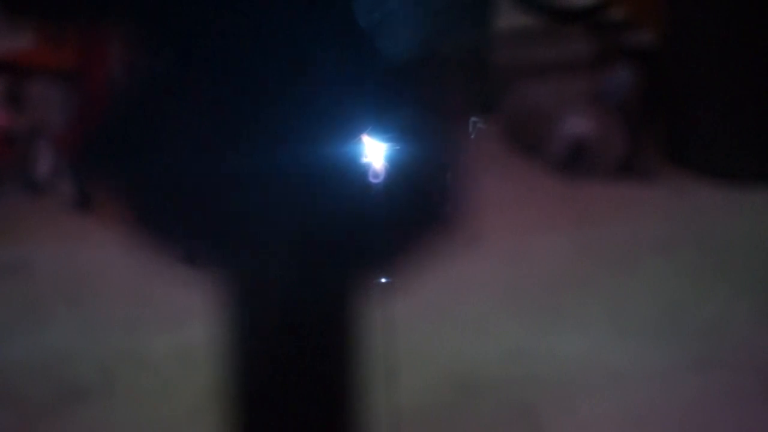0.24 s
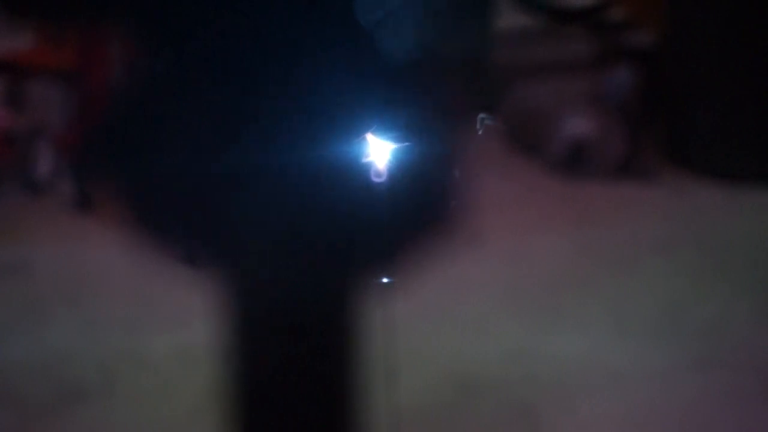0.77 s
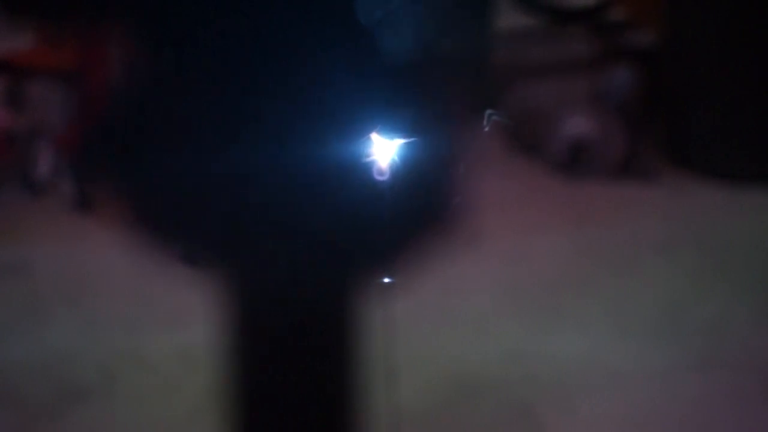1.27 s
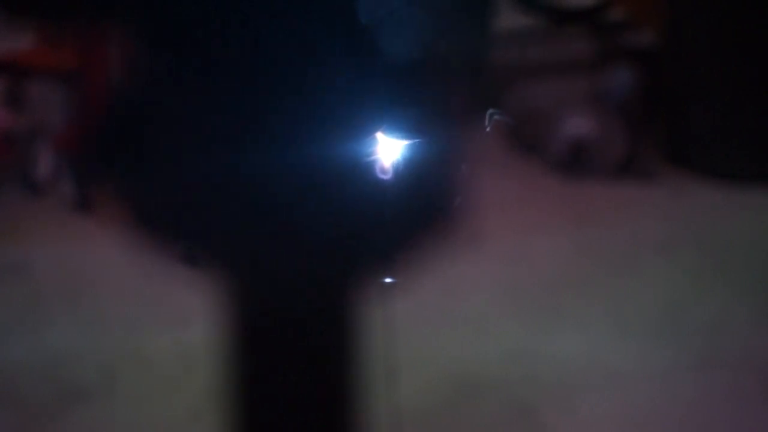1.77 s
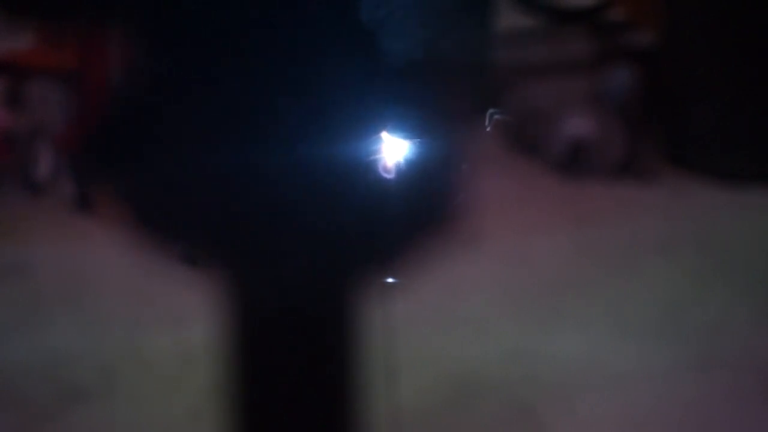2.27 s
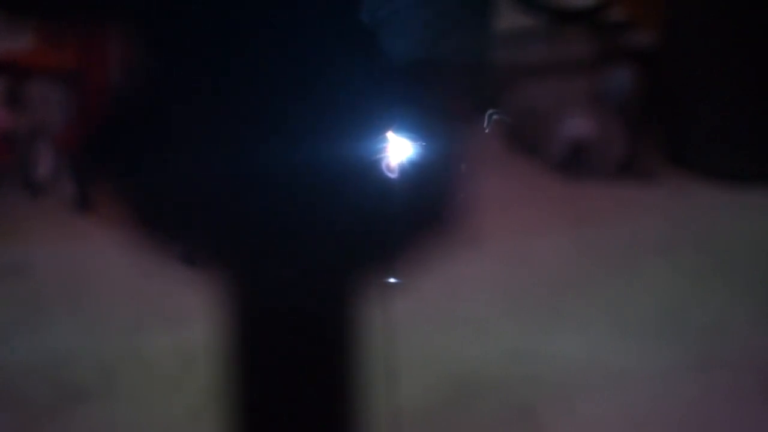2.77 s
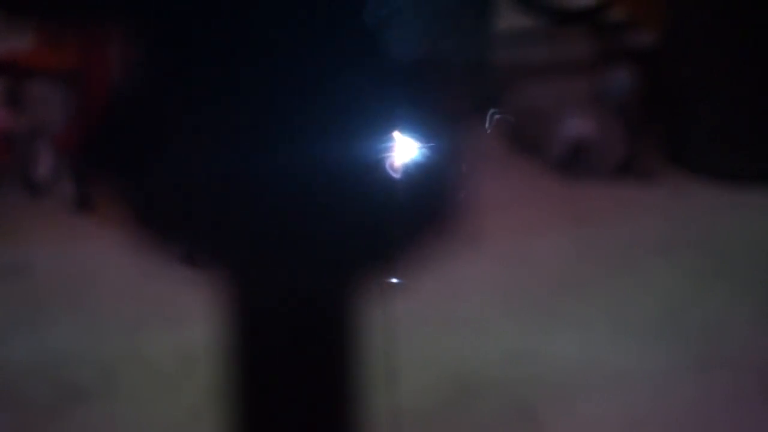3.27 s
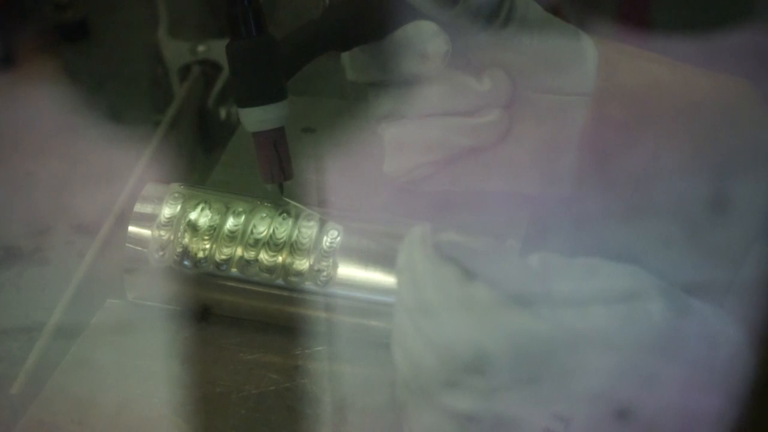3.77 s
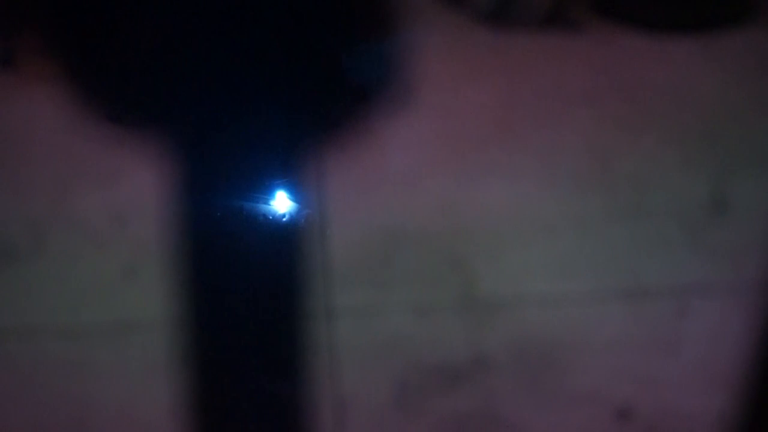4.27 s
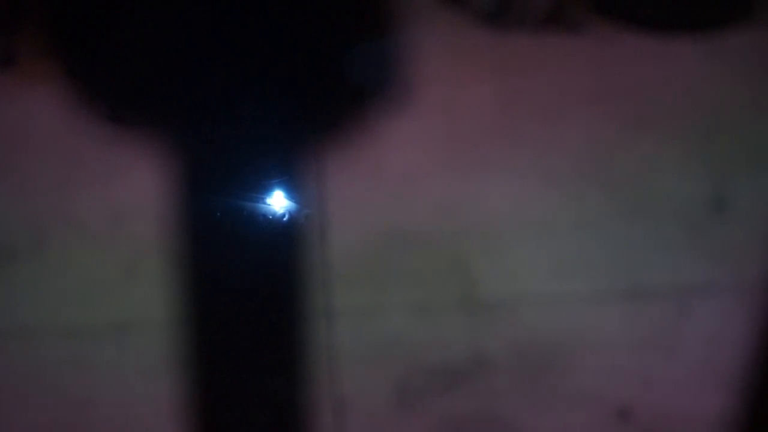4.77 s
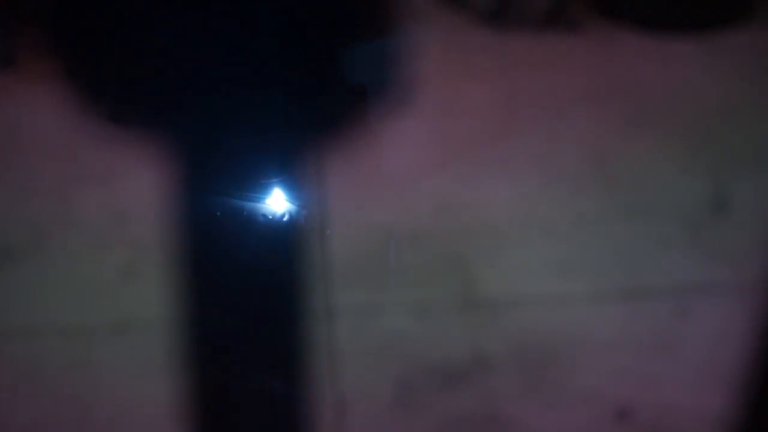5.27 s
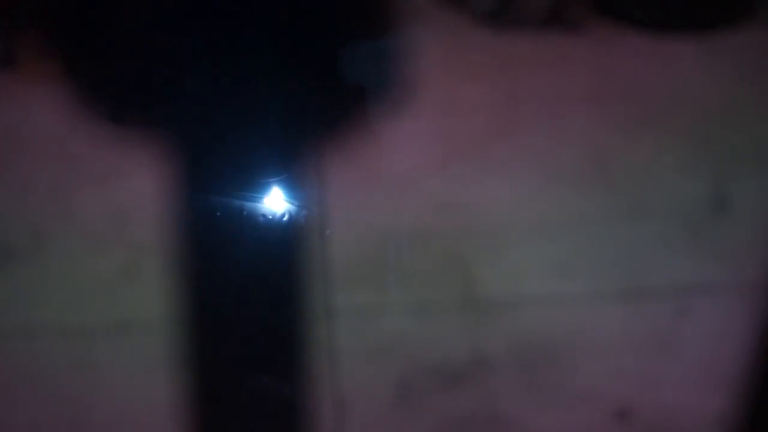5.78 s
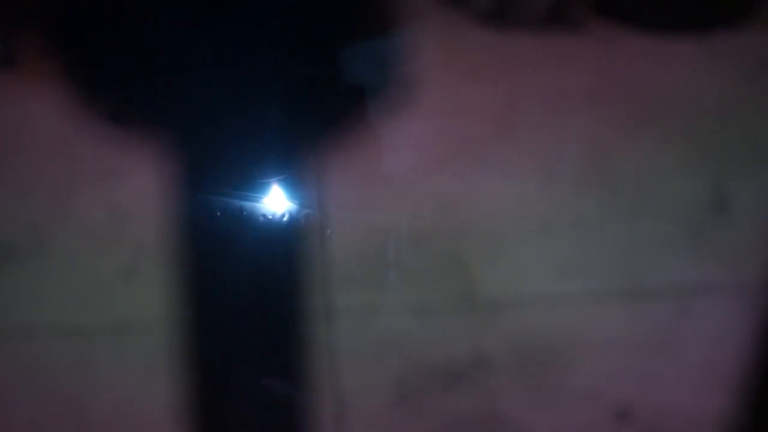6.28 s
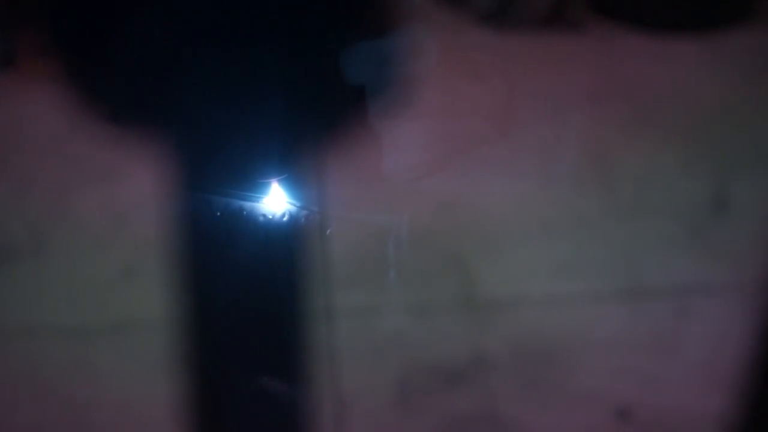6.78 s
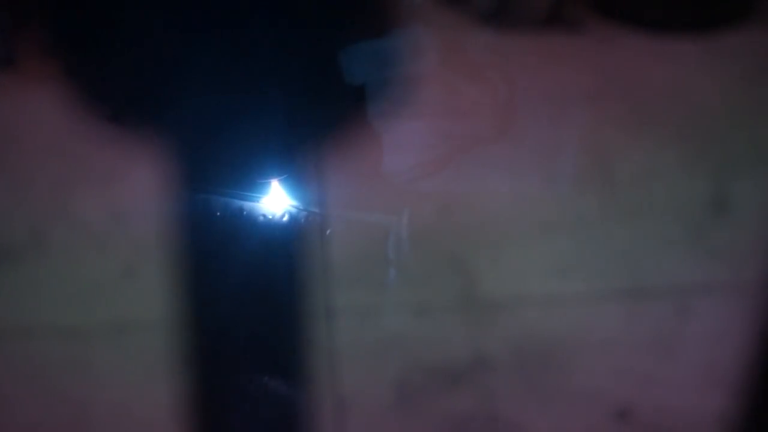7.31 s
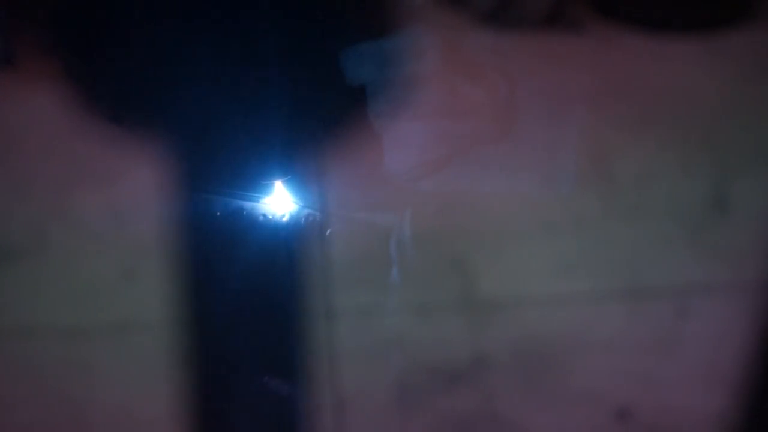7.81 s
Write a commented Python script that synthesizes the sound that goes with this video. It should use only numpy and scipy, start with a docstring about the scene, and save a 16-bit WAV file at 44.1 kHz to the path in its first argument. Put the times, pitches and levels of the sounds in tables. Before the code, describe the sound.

Close raspy electric arc buzz and hiss in a workshop, a short fan-filled pause with dull bumps, then a crackling restart at lower pitch.

```python
"""Close on a workshop bench, in stereo: an AC TIG arc buzzes on a metal tube over the welder's fan.
Each reversal of the current snaps the air, and hiss pulses with the snaps; tiny spits ring the bench.
The arc stops at 3.75 s; the fan stands out and a few soft handling knocks fall in and just after the pause.
At 4.07 s the arc is struck again at a lower frequency, fizzes and sputters with sharp pops, then settles
and swells. Later its hiss brightens in short spells, with another burst of pops near 7.5 s."""
import sys
import numpy as np
from scipy import signal
from scipy.fft import rfft, irfft, next_fast_len
from scipy.io import wavfile
from scipy.ndimage import uniform_filter1d, map_coordinates

SR = 44100
rng = np.random.default_rng(int(sys.argv[2]) if len(sys.argv) > 2 else 0)


def generate_wav(signal):
    """Clip the signal to [-1, 1] and save it as 16-bit WAV at the path in sys.argv[1]."""
    frames = np.transpose(np.atleast_2d(signal))
    scaled = np.clip(frames, -1, 1) * 32767
    pcm = np.round(scaled).astype(np.int16)
    wavfile.write(sys.argv[1], SR, pcm)


N = 355005
T = np.arange(N) / SR
TOP_HZ = 15800  # upper limit of the sound


def amp(db):
    """Decibels to gain."""
    return np.exp(np.asarray(db) * np.log(10) / 20)


def unit(x):
    """Scale to rms 1."""
    return x / np.sqrt(np.mean(x ** 2) + 1e-20)


def along(points, hz):
    """Read (f/Hz, value) points on a log frequency axis."""
    f, v = np.transpose(points)
    return np.interp(np.log(hz + 1), np.log(f + 1), v)


def curve(points):
    """Read (t/s, value) points at every sample."""
    t, v = np.transpose(points)
    return np.interp(T, t, v)


def wobble(rate, size=32):
    """A smooth random curve, rate knots a second."""
    knots = rng.standard_normal(int(N * rate / SR) + 4)
    coarse_t = T[::size]
    return np.interp(T, coarse_t, map_coordinates(knots, [coarse_t * rate]))


def sine(hz, phase):
    """A tone of rms 1 with a wandering phase in radians."""
    return np.sqrt(2) * np.sin(2 * np.pi * hz * T + phase)


def filtered(x, response):
    """x times a response of frequency."""
    m = next_fast_len(N + 8192)
    return irfft(rfft(x, m) * response(np.fft.rfftfreq(m, 1 / SR)), m)[..., :N]


def width(hz, split_hz=1150, peak_hz=2400, peak=0.91):
    """Side-to-mid ratio of diffuse sound.

    The channels agree in the bass, but for the deepest rumble, and differ most around 2.4 kHz."""
    apart = 0.81 + peak / (1 + ((hz - peak_hz) / 300) ** 2)
    rumble = 0.72 / (1 + (hz / 35) ** 2)
    return 0.043 + rumble + apart / (1 + (split_hz / (hz + 1)) ** 6)


def noise(spectrum):
    """Diffuse stereo noise of rms 1."""
    mid = filtered(rng.standard_normal(N), lambda hz: amp(along(spectrum, hz)))
    side = filtered(rng.standard_normal(N), lambda hz: amp(along(spectrum, hz)) * width(hz))
    return unit(np.array([mid + side, mid - side]))


def ring(modes, t, scatter, scatter_db=1.2):
    """Damped modes, a little different at each blow."""
    out = 0
    for hz, db, t60 in modes:
        decay = amp(db + rng.normal(0, scatter_db) - 60 * t / t60)
        out = out + decay * np.sin(2 * np.pi * hz * (1 + scatter * rng.normal()) * t)
    return out


def cycle(harmonics, turns, fades=(), age=0, size=65536):
    """Play stereo harmonics at rms 1 along a count of cycles; some swell or fade with age in seconds."""
    harmonics = harmonics / np.sqrt(np.sum(abs(harmonics) ** 2) / 2 / 2)
    wave = irfft(np.pad(harmonics, ((0, 0), (1, 0))), size) * size / 2
    out = wave[:, (turns * size).astype(int) % size]
    for k, db_per_s in fades:
        if harmonics[0, k - 1]:
            partial = np.real(harmonics[:, k - 1, None] * np.exp(2j * np.pi * k * turns))
            out = out + (amp(db_per_s * age) - 1) * partial
    return out


def snaps(rate, orders, treble, sides, side_db, lean, crackle, snap_gain, snap_hz, bunching, diffuse,
          near, near_decay, back_snap, back_echo, balance, crackle_turn=0.52, bounce=0.66, bounce_s=.00062):
    """Stereo harmonics of two snaps a cycle, one at each reversal of the current, with steady echoes."""
    k = np.arange(1, int(TOP_HZ / rate) + 1)
    hz = k * rate
    # the work and bench answer within milliseconds; the room fills the time between the snaps
    delay = np.arange(2 * len(k) + 2) / (2 * len(k) + 2) / rate
    since_crackle = (delay - crackle_turn / rate) % (1 / rate)
    answer = unit(np.exp(-delay / near_decay) + back_echo * np.exp(-since_crackle / near_decay))
    strength = near * answer + diffuse
    echoes = strength * rng.standard_normal((2, len(delay)))
    mid, side = rfft(echoes)[:, k] / np.sqrt(len(delay))
    # the main snap bounces off the bench, and the treble arrives mostly by way of the room
    rebound = -bounce * np.exp(-2j * np.pi * hz * bounce_s)
    snap = snap_gain * (1 + rebound + rebound ** 2) / (1 + (hz / snap_hz) ** 4)
    # a weaker crackle falls about half a cycle behind it
    snap = snap * (1 + crackle * np.exp(-2j * np.pi * k * crackle_turn))
    # the return snap is duller than the main one
    return_snap = back_snap / (1 + (hz / 1800) ** 2) * np.exp(-2j * np.pi * k * balance)
    mid = mid + snap + return_snap
    harmonic_db = along(treble, hz) + rng.normal(0, 1.7, len(k))
    for multiple, db in orders:
        harmonic_db[multiple - 1] = db
    mid = mid / abs(mid) * amp(harmonic_db)
    # even the ringing harmonics are loudest just behind each snap and sink before the next
    swell = strength ** bunching
    for _ in range(3):
        mid = rfft(irfft(np.pad(mid, 1)) * swell)[k]
        mid = mid / abs(mid) * amp(harmonic_db)
    # echoes from the sides pulse with the same snaps and fill the gaps between the strong harmonics
    side_level = amp(along(sides, hz) + side_db + rng.normal(0, 1.4, len(k)))
    side = side / abs(side) * side_level + mid * along(lean, hz)
    return hz, np.array([mid + side, mid - side])


def rasp(harmonics, hz, turns, drift=0.37, leftward_db=-1.0):
    """The sharp edges of the arc; as the torch creeps, each high harmonic slowly waxes or wanes."""
    random = rng.standard_normal(len(hz)) + 1j * rng.standard_normal(len(hz))
    shift = drift * np.minimum(hz / 12000, 1) * random
    travel = .5 + .5 * np.cos(2 * np.pi * T / 7.5)
    edge = travel * cycle(harmonics * (1 + shift), turns)
    edge = edge + (1 - travel) * cycle(harmonics * (1 - shift), turns)
    return amp(0.28 * wobble(110)) * amp([[leftward_db / 2], [-leftward_db / 2]]) * edge


def spell(start, stop, fade_s=0.046):
    """1 during a spell of brighter hiss, with short ramps at both ends."""
    return np.clip(np.minimum(T - start, stop - T) / fade_s + .5, 0, 1)


# spells of brighter hiss, the first as the arc is struck:
# (start t/s, end t/s, sizzle change level/dB, fizz level/dB against the sizzle)
BRIGHT_SPELLS = [(4.06, 4.5, -0.5, -6.5), (5.998, 6.45, 0.5, -10), (6.92, 7.38, 2, -8),
                 (7.747, 8.1, -0.5, -15)]


def unrest_db(struck_s, calm_db=-6.5, strike_db=18, settle_s=.24):
    """Sizzle against rasp: high when the arc is struck, then calm, and shifted a little in each spell."""
    settling = strike_db * np.exp(-np.maximum(T - struck_s, 0) / settle_s)
    return calm_db + settling + sum(db * spell(start, stop) for start, stop, db, _ in BRIGHT_SPELLS)


# spectrum of the plasma's hiss: (f/Hz, relative level/dB)
SIZZLE_SPECTRUM = [(100, -24), (300, -7), (700, -5.5), (1350, -8), (1900, -4), (2450, -11), (3400, 1.5),
                   (4200, -2.5), (5200, -0.5), (8000, -2), (11000, -5), (14500, -10.5), (16000, -29)]
# bright fizz added in the spells: (f/Hz, relative level/dB)
FIZZ_SPECTRUM = [(3000, -14), (6000, -4), (9000, -5), (13000, 0), (16000, -4)]


def sizzle(turns, balance):
    """The plasma hisses hardest just after each reversal, and brighter in the spells."""
    flare = 1 + 0.46 * np.exp(-(turns % 1) / 0.028)
    flare = flare + 0.53 * np.exp(-((turns - balance) % 1) / 0.029)
    fizz = sum(amp(db) * spell(start, stop) for start, stop, _, db in BRIGHT_SPELLS)
    hiss = noise(SIZZLE_SPECTRUM) + noise(FIZZ_SPECTRUM) * fizz
    return amp(1.45 * wobble(90)) * unit(flare * hiss)


# the second weld catches weakly, idles on a starting current and is then brought up:
# (t/s, level/dB against full current)
WELD_CURRENT = [(3.75, -1.5), (4.07, -12), (4.17, -15), (4.22, -8), (4.55, -7), (4.95, -6.5), (5.2, -1)]


def arc(span, clock, drone_curve, fades, drone_top_hz, drone_db, buzz_db, buzz_db_per_s, rasp_db,
        sizzle_db, balance, **snap_settings):
    """A burning arc: its column breathes in the bass, its reversals snap and rasp, its plasma sizzles."""
    start, stop = span
    rate, first_snap = clock
    turns = rate * (T - first_snap + 2.5e-6 * wobble(45))
    hz, harmonics = snaps(rate, balance=balance, **snap_settings)
    low, high = (hz > 200) & (hz < drone_top_hz), hz > 2450
    age = np.clip(T - (start + stop) / 2, -2, 2)
    current = curve(WELD_CURRENT)
    drone = amp(curve(drone_curve) + drone_db) * cycle(harmonics * low, turns, fades, age)
    # the buzz follows the current only in part; rasp and sizzle follow in full
    buzz_level = buzz_db + 0.31 * current + buzz_db_per_s * (T - start) + 0.9 * wobble(70)
    buzz = amp(buzz_level) * cycle(harmonics * ~(low | high), turns, fades, age)
    unrest = unrest_db(start)
    calm = 1 / np.hypot(1, amp(unrest))  # a restless arc trades its tone for hiss
    steady = calm * amp(current + 0.38 * wobble(9))
    tone = calm * (drone + buzz) + steady * amp(rasp_db) * rasp(harmonics * high, hz, turns)
    hiss = steady * amp(unrest + sizzle_db) * sizzle(turns, balance)
    # the arc hisses into life and is cut off sharply
    burning = np.clip((T - start) / 0.011, 0, 1) * np.clip((stop - T) / 0.008, 0, 1)
    return burning * (tone + hiss)


# low harmonics, then single high ones, strong or weak: (multiple of the cycle, relative level/dB)
FIRST_HARMONICS = [(1, -14), (2, 10), (3, -9), (4, -2), (5, -7), (6, -8.5), (7, -10.5), (8, -9), (9, -12),
                   (10, -23.5), (11, -10), (12, -15.5), (13, -36), (14, -13.5), (15, -16), (16, -25.5),
                   (17, -56), (18, -55), (19, -22.5), (20, -18), (21, -44), (22, -16), (23, -8.5),
                   (24, -20.5), (25, -15), (26, -3), (27, -6), (28, -3.5), (29, -16), (30, -3), (31, -11),
                   (32, -1.5), (33, -11), (34, -14.5), (35, -6), (36, -8), (37, -9.5), (38, -10), (39, -20),
                   (40, -8.5), (41, 1), (42, -18), (43, -7.5), (44, -10), (45, -10), (46, -7.5),
                   (47, -15.5), (48, -17), (49, -8), (53, -28), (54, -10.5), (56, -2), (64, -8),
                   (67, -11.5), (69, -23), (70, -9.5), (71, -20), (72, -18), (77, -9.5), (78, -11),
                   (82, -17), (87, -11.5), (90, -20), (102, -21), (113, -17.5), (114, -18)]
# all the other harmonics: (f/Hz, relative level/dB)
FIRST_OTHERS = [(5900, -9), (6600, -17), (7400, -10), (8400, -24), (9200, -14.5), (10000, -16),
                (10900, -22), (11700, -23.5), (13000, -24), (14500, -21), (15400, -35)]
# harmonics that arrive from the sides: (f/Hz, relative level/dB)
FIRST_SIDES = [(150, -40), (700, -35), (1100, -27), (1450, -15), (1900, -16.5), (2300, -14), (2800, -17),
               (3400, -11), (4200, -15), (5100, -15.5), (6200, -13), (7300, -12.5), (8500, -18),
               (10000, -15.5), (12000, -23), (14500, -25)]
# how far the buzz leans to one side: (f/Hz, lean from -1 right to 1 left)
FIRST_LEANING = [(900, 0.0066), (1500, 0.21), (2400, -0.041), (3500, -0.21), (4400, 0.47), (5800, -0.38),
                 (7000, -0.011), (9400, -0.37), (10800, 0.22), (12700, -0.53), (14500, 0.19)]
# low drone: (t/s, relative level/dB)
FIRST_DRONE_CURVE = [(0.0, -24), (0.76, -25.5), (1.66, -34), (2.79, -37.5), (3.6, -38.5)]
# harmonics that swell or fade as the torch creeps along: (multiple of the cycle, slope/dB per s)
FIRST_CREEP = [(5, 1), (7, -4.5), (8, 1)]


def first_weld():
    """A run at the higher frequency, struck just before the start and soon steady."""
    return arc(
        span=(-0.1, 3.748),  # lit, out: t/s
        clock=(125.795, 2.0019),  # cycles a second, time of one snap t/s
        drone_curve=FIRST_DRONE_CURVE, fades=FIRST_CREEP, drone_top_hz=330, drone_db=0,
        buzz_db=-26.0, buzz_db_per_s=0.64, rasp_db=-15.5, sizzle_db=-19.0, balance=.75,
        orders=FIRST_HARMONICS, treble=FIRST_OTHERS, sides=FIRST_SIDES, side_db=0.5, lean=FIRST_LEANING,
        crackle=0.31, snap_gain=0.82, snap_hz=11000, bunching=0.03, diffuse=0.76,
        near=0.77, near_decay=0.0014, back_snap=2.6, back_echo=0.2)


# rushing air: (f/Hz, relative level/dB)
AIR_SPECTRUM = [(25, -26), (70, -15), (145, -15.5), (250, 1), (340, -6.5), (440, -5.5), (530, -1),
                (650, -7), (780, -9), (900, -7), (1050, -15), (1500, -17.5), (2500, -27), (5000, -29),
                (10000, -44), (15000, -51)]
# blade tones: (f/Hz, relative level/dB)
BLADE_TONES = [(398.4, -5.5), (500.6, -8.5), (796.7, -10.5)]


def fan(air_db=-1.5, tones_db=-1, lit_tones_db=-6):
    """Rushing air with unsteady blade tones that stand out while the arc is off, and a thin motor whine."""
    tones = 0
    for hz, db in BLADE_TONES:
        tones = tones + amp(db + 3.0 * wobble(16)) * sine(hz, 0.76 * wobble(14))
    lit = np.interp(T, [3.72, 3.76, 4.07, 4.11], [1, 0, 0, 1])
    # it rises 8 dB while the arc is off and falls slowly throughout
    level_db = -31.5 + 8 * (1 - lit) - 0.35 * T
    whine = amp(-42 + 1.7 * wobble(5.6)) * sine(866, 0.4 * wobble(6))
    air = amp(air_db) * noise(AIR_SPECTRUM)
    return whine + amp(level_db) * (air + amp(tones_db + lit * lit_tones_db) * tones)


# the arc misfires and spits: (t/s, level/dB)
ARC_SPITS = [(3.692, -18), (4.1158, -3.5), (4.142, -18), (4.1938, -14.5), (4.1993, -4.5), (4.2043, -6),
             (4.2225, -17), (4.232, -2.5), (4.2422, -4), (4.2543, -4), (4.2762, -7), (4.2808, -9),
             (4.3335, -4), (4.3382, -4), (4.3478, -4.5), (4.361, -4), (4.367, -10), (4.3765, -6.5),
             (4.4007, -2.5), (4.4183, -5), (4.4243, -6), (4.4338, -4), (4.4473, -3.5), (4.4528, -5),
             (4.4628, -2), (4.4758, -2), (4.4962, -3), (4.5012, -7.5), (4.975, -25), (5.180, -15.5),
             (5.199, -18), (5.204, -15), (5.228, -15), (5.993, -13.5), (6.185, -16), (7.535, -17),
             (7.5542, -11), (7.5605, 3), (7.5648, -0.5), (7.5828, -6), (7.5878, 1), (7.612, -11),
             (7.6172, -0.5), (7.966, -14)]
# modes of bench and tube, before scatter and dulling: (f/Hz, relative level/dB, t60/s)
BENCH_MODES = [(524, -7.5, 0.011), (650, 0, 0.019), (976, -0.5, 0.019), (1453, -7.5, 0.012),
               (1885, -5, 0.014), (3550, -18, 0.006), (5000, -7, 0.0053)]


def pops(crack_db=-22, crack_t60=0.013, low_cut_hz=280, small_db=-27, pivot_hz=650,
         hot_dull_db_per_octave=6.5):
    """Each spit of the arc is a crack that rings the bench and tube for a few milliseconds."""
    out, t = np.zeros((2, N + SR)), np.arange(SR // 10) / SR
    # the weld pool also flutters with many tiny spits, except around the pause
    times = rng.uniform(0, N / SR, size=70)
    small = [(s, small_db + 3 * rng.normal()) for s in times if not 3.7 < s < 4.2]
    for s, db in ARC_SPITS + small:
        # at full current a spit is a slower puff: its high modes ring less
        dull = hot_dull_db_per_octave * amp(np.interp(s, *np.transpose(WELD_CURRENT))) ** 4
        modes = [(hz, level - dull * np.log2(hz / pivot_hz), t60) for hz, level, t60 in BENCH_MODES]
        crack = amp(crack_db - 2 * dull - 60 * t / crack_t60) * rng.standard_normal((2, len(t)))
        out[:, round(s * SR):][:, :len(t)] += amp(db) * (ring(modes, t, scatter=0.045) + crack)
    # the loudest swings are rounded off, and so small a source radiates little bass
    no_bass = signal.butter(3, low_cut_hz, "high", fs=SR, output="sos")
    return signal.sosfilt(no_bass, np.tanh(out[:, :N]))


# how long the room rings: (f/Hz, t60/s)
ROOM_DECAY = [(200, 0.31), (2000, 0.65), (10000, 0.0084)]


def workshop(x):
    """The room's tail, each frequency dying at its own speed."""
    hz, t, z = signal.stft(rng.standard_normal((2, SR // 2)), SR, nperseg=256)
    spread = np.array([np.ones_like(hz), width(hz)])[:, :, None]
    z = z * amp(-60 * t / along(ROOM_DECAY, hz)[:, None]) * spread
    mid, side = signal.istft(z, SR, nperseg=256)[1]
    tail = np.array([mid + side, mid - side]) / np.linalg.norm(mid)
    delayed = np.pad(x, ((0, 0), (200, 0)))  # in samples
    return signal.fftconvolve(delayed, tail, axes=1)[:, :N]


# handling: (t/s, relative level/dB, pitch f/Hz)
HANDLING = [(3.751, -20, 268), (3.877, -21, 212), (3.925, -19, 268), (3.958, -16, 270), (4.031, -14, 240),
            (4.088, -16, 232)]
# modes of a knock, before scatter: (multiple of the pitch, relative level/dB, t60/s)
KNOCK_MODES = [(0.3, -18, 0.078), (0.86, -14.5, 0.064), (1, -0.5, 0.046)]


def knocks():
    """Gloved hands bump the work on the bench: soft onsets and a few short, low modes."""
    out, t = np.zeros(N + SR), np.arange(SR // 5) / SR
    soft_onset = 1 - np.exp(-t / 0.004)
    for s, db, pitch in HANDLING:
        modes = [(multiple * pitch, level, t60) for multiple, level, t60 in KNOCK_MODES]
        out[round(s * SR):][:len(t)] += amp(db + 4.5) * ring(modes, t, scatter=0.01) * soft_onset
    return out[:N]


# low harmonics, then single high ones, strong or weak: (multiple of the cycle, relative level/dB)
SECOND_HARMONICS = [(1, -20.5), (2, -17.5), (3, 0.5), (4, -2.5), (5, -10.5), (6, 0), (7, -7), (8, -27),
                    (9, -12), (10, -11.5), (11, -10), (12, -23), (13, -38), (14, -29), (15, -26), (16, -5),
                    (17, -10), (18, -9.5), (19, -1), (20, -10.5), (21, -18), (22, -10), (23, -53),
                    (24, -45), (25, -24), (26, -19), (27, -22), (28, -8), (29, -11), (30, -0.5), (31, -13),
                    (32, -9), (33, 1.5), (34, -1.5), (35, -3), (36, -4), (37, -9), (38, -4.5), (39, -4.5),
                    (40, -4.5), (41, -12), (42, -8.5), (43, -9.5), (44, -4.5), (45, -5.5), (46, -0.5),
                    (47, -6.5), (48, -1.5), (49, -1), (50, -8), (51, -1), (52, -7.5), (53, -3.5), (54, -18),
                    (56, -24), (58, -1), (59, -9.5), (60, -10), (63, -2), (65, -11.5), (66, -6), (73, -8),
                    (75, -4), (76, -7.5), (77, -10.5), (79, -6), (82, -3), (84, -5), (93, -12), (95, -5),
                    (98, -9), (100, -8.5), (106, -16), (117, -11), (123, -10), (142, -15.5)]
# all the other harmonics: (f/Hz, relative level/dB)
SECOND_OTHERS = [(5900, -17.5), (6600, -14), (7400, -15), (8400, -18.5), (9200, -20), (10000, -19),
                 (10900, -22.5), (11700, -21.5), (13000, -22), (14500, -26), (15400, -20)]
# harmonics that arrive from the sides: (f/Hz, relative level/dB)
SECOND_SIDES = [(150, -42), (700, -52), (1100, -15.5), (1450, -7), (1900, -13.5), (2300, -2.5),
                (2800, -6.5), (3400, -6.5), (4200, -5.5), (5100, -7.5), (6200, -10), (7300, -5),
                (8500, -9.5), (10000, -16), (12000, -18), (14500, -25)]
# how far the buzz leans to one side: (f/Hz, lean from -1 right to 1 left)
SECOND_LEANING = [(900, 0), (1300, 0.63), (2000, -0.46), (3000, -0.9), (3900, -0.17), (4400, 0.36),
                  (5400, 0.27), (6500, -0.77), (8500, -0.45), (10300, -0.9), (13000, -0.66),
                  (15000, -0.081)]
# low drone: (t/s, relative level/dB)
SECOND_DRONE_CURVE = [(4.55, -30.5), (4.79, -28), (5.65, -26.5), (7.4, -31)]
# harmonics that swell or fade as the torch creeps along: (multiple of the cycle, slope/dB per s)
SECOND_CREEP = [(4, 1.4), (5, -5.5), (9, -4)]


def second_weld():
    """A run at the lower frequency that swells from a low starting current."""
    return arc(
        span=(4.072, 8.2),  # lit, out: t/s
        clock=(104.415, 6.0070),  # cycles a second, time of one snap t/s
        drone_curve=SECOND_DRONE_CURVE, fades=SECOND_CREEP, drone_top_hz=680, drone_db=3.5,
        buzz_db=-24.5, buzz_db_per_s=0.31, rasp_db=-15.5, sizzle_db=-15.5, balance=.69,
        orders=SECOND_HARMONICS, treble=SECOND_OTHERS, sides=SECOND_SIDES, side_db=-1.5, lean=SECOND_LEANING,
        crackle=0.72, snap_gain=0.61, snap_hz=7000, bunching=0.18, diffuse=0.71,
        near=1.22, near_decay=0.0011, back_snap=2.63, back_echo=0.65)


def scene():
    """Two welds, spits and knocks over the fan; the room answers the spits and knocks."""
    hits = pops() + knocks()
    echo = amp(-18) * workshop(hits)
    return first_weld() + second_weld() + hits + echo + fan()


def gain_control(x, limit_db=-11.5, recover_db_per_s=45, size=176):
    """Loud pops push the gain down within milliseconds; it then climbs back at a steady rate."""
    level = 10 * np.log10(np.abs(uniform_filter1d(x.mean(axis=0) ** 2, size)) + 1e-12)
    climb = recover_db_per_s * T
    cut = np.maximum.accumulate(np.maximum(level - limit_db, 0) + climb) - climb
    return x * amp(-uniform_filter1d(cut, size // 2))


def record(dry, top=0.92, knee=6):
    """The recorder ducks under loud pops, rounds off the peaks and keeps nothing above its band limit."""
    x = gain_control(dry)
    rounded = x / (1 + abs(x / top) ** knee) ** (1 / knee)
    return filtered(rounded, lambda hz: hz < TOP_HZ)


dry = scene()
out = record(dry)
generate_wav(out)
```